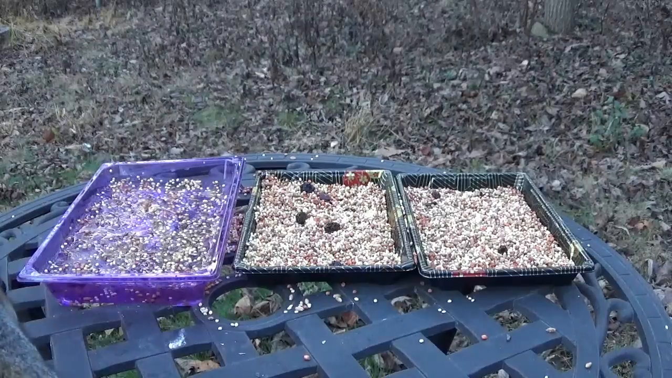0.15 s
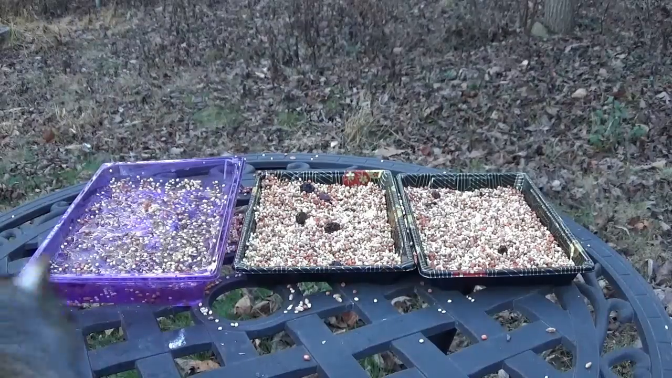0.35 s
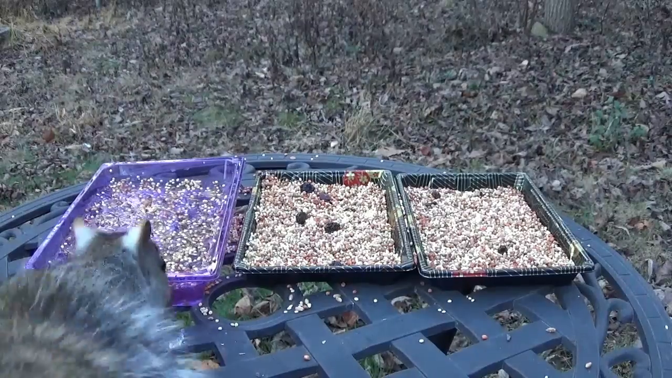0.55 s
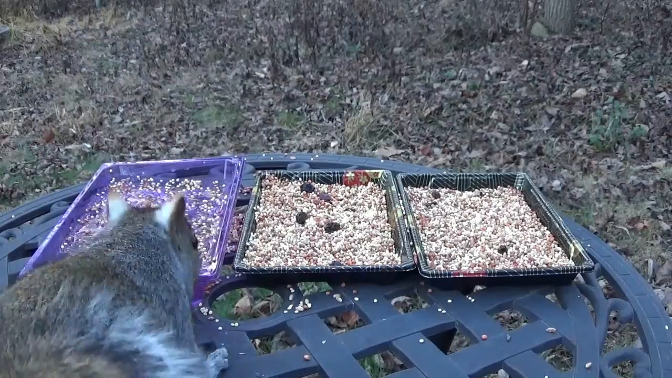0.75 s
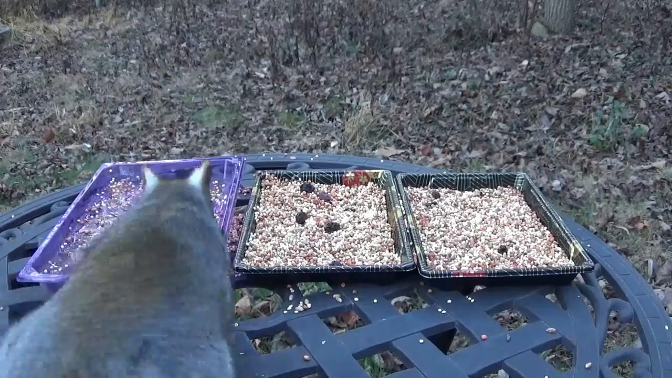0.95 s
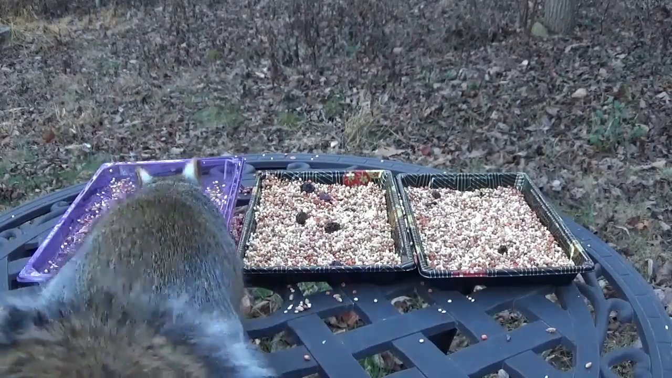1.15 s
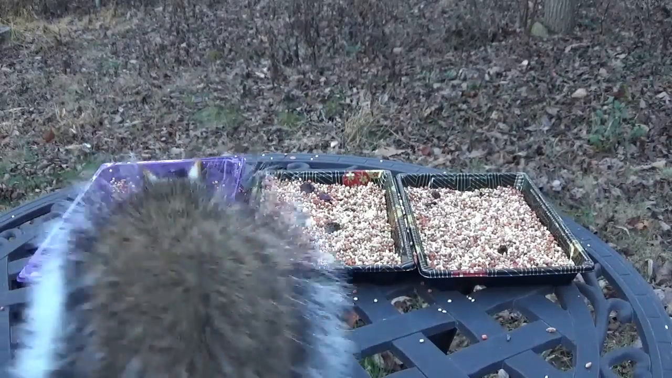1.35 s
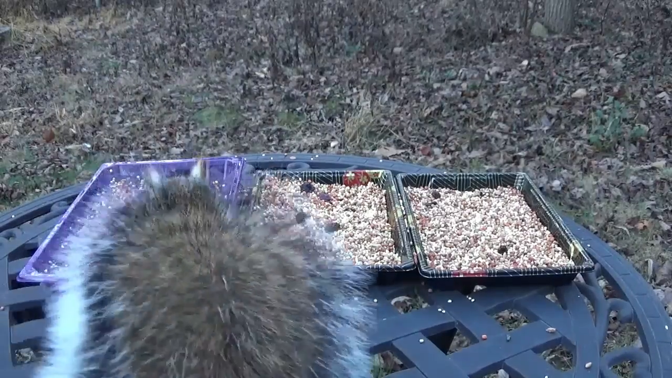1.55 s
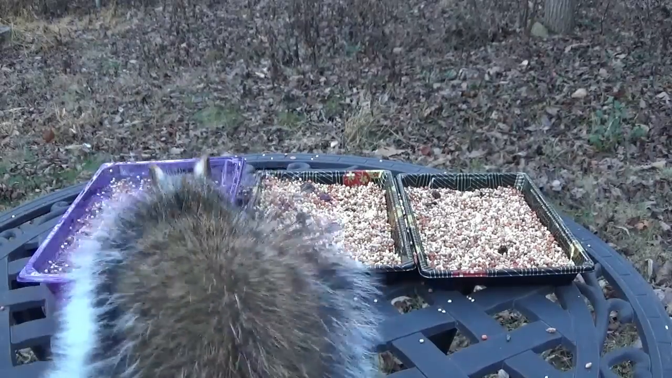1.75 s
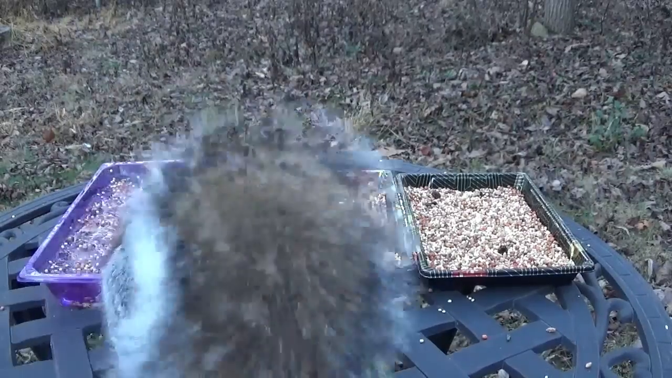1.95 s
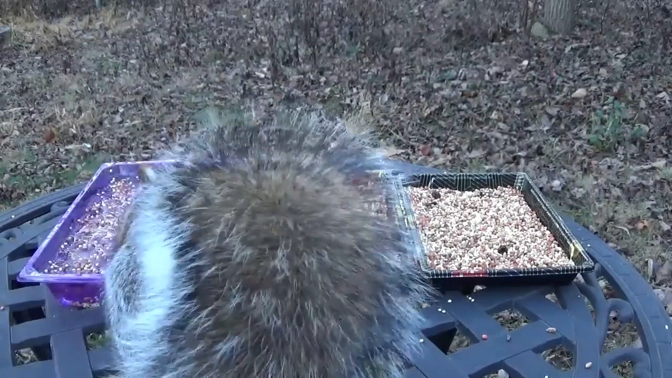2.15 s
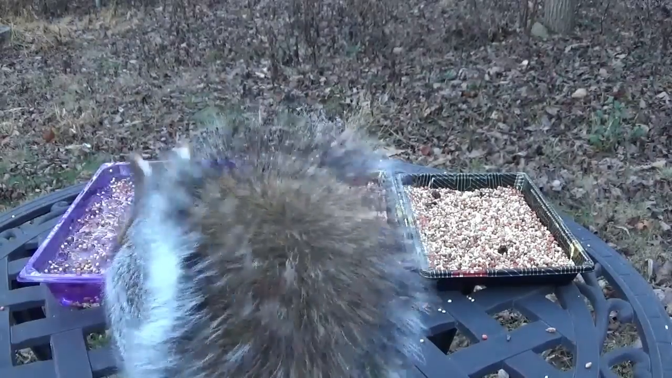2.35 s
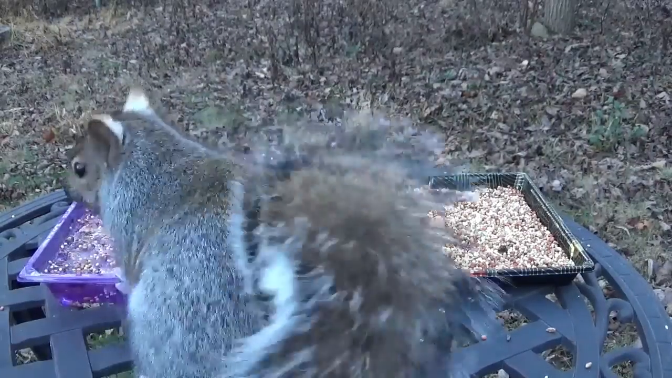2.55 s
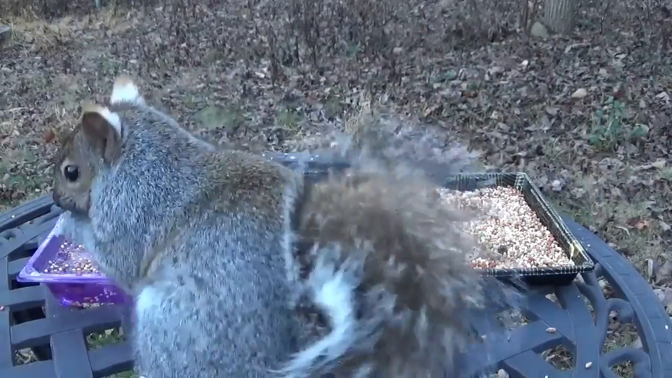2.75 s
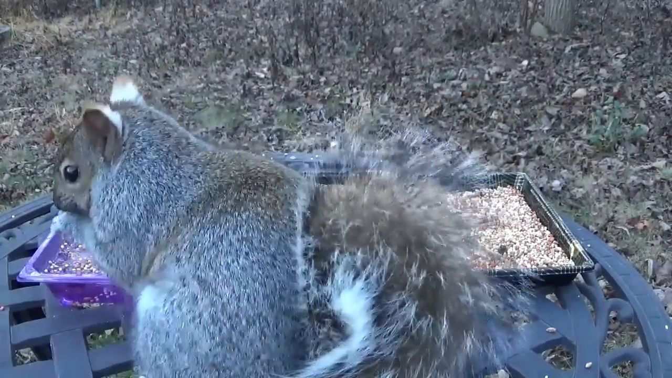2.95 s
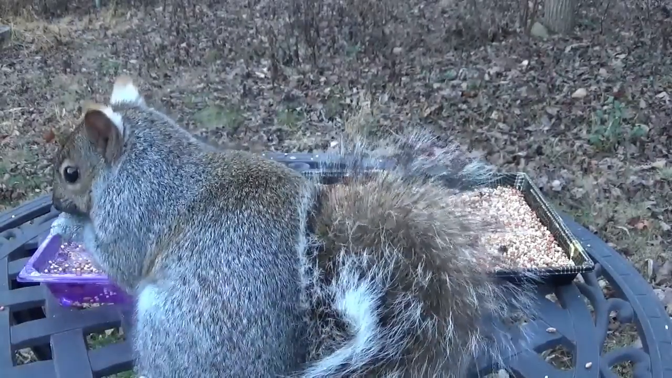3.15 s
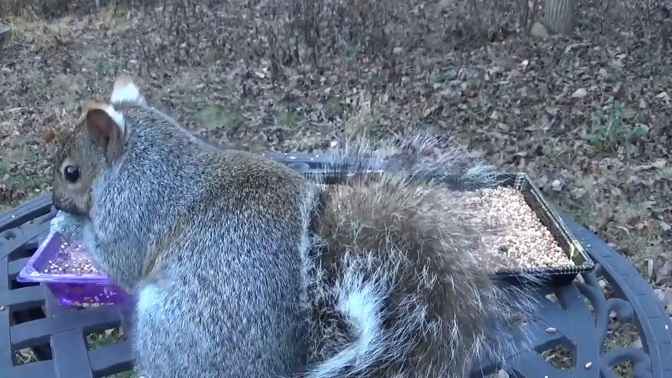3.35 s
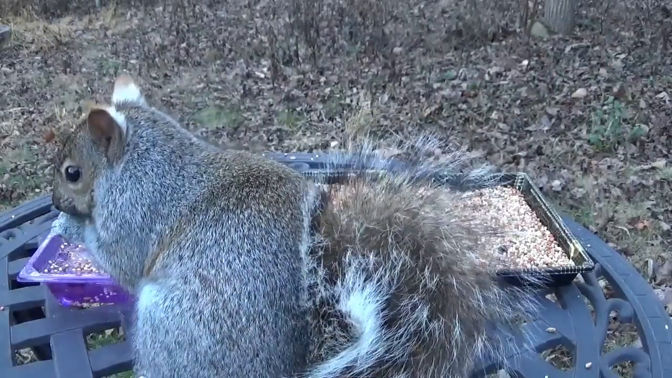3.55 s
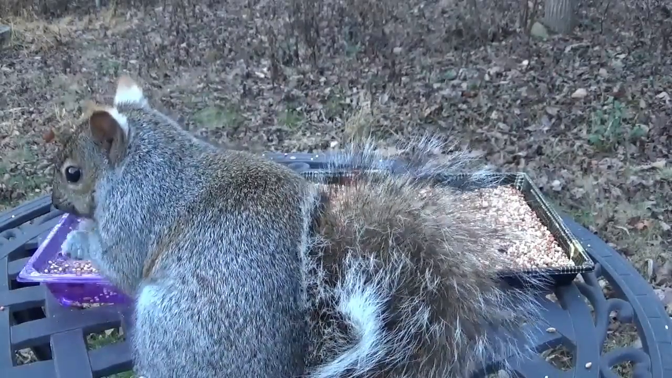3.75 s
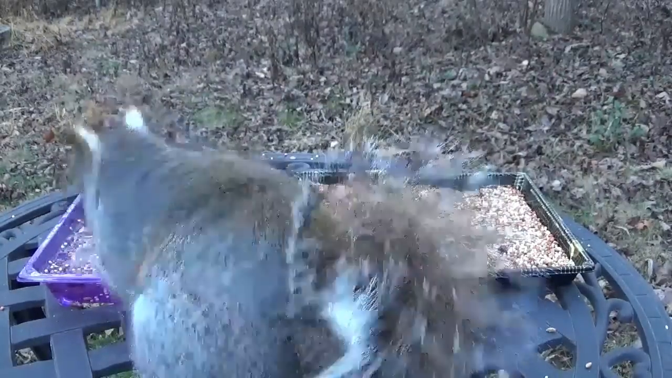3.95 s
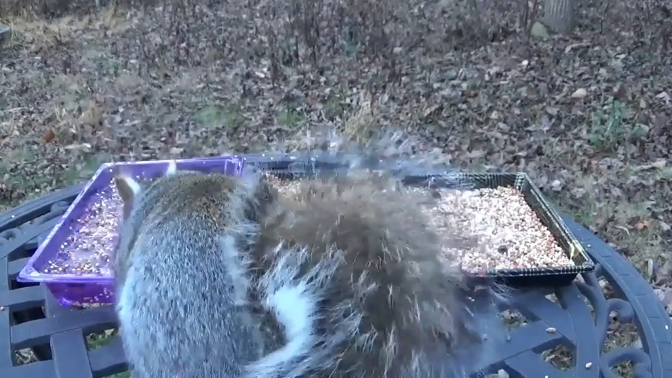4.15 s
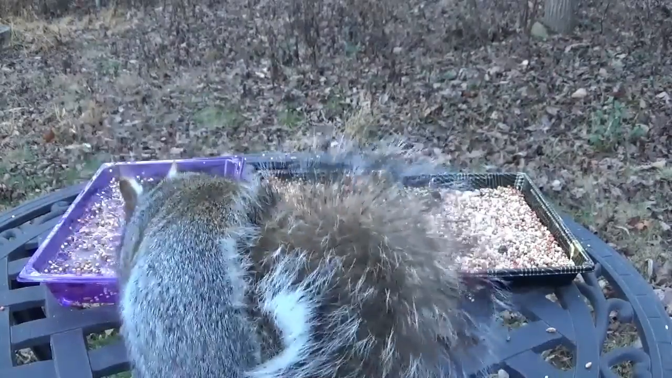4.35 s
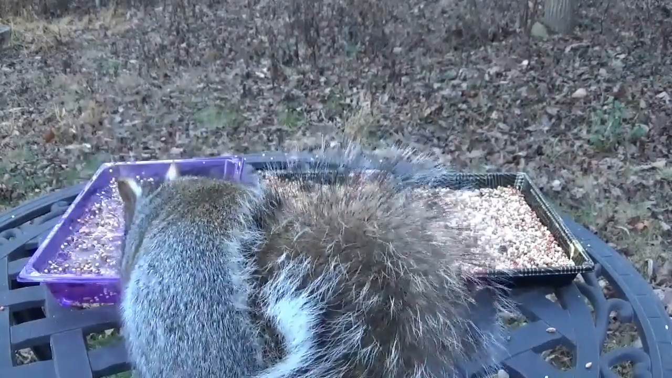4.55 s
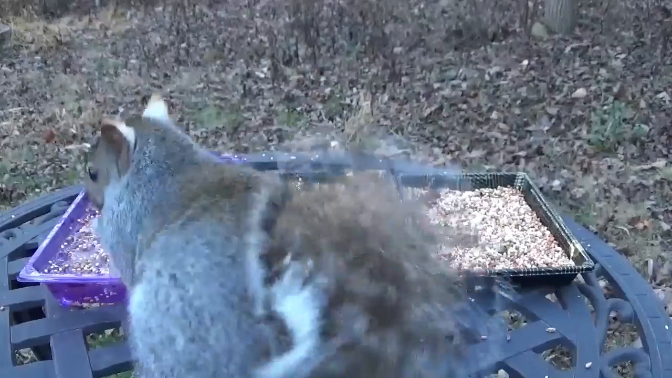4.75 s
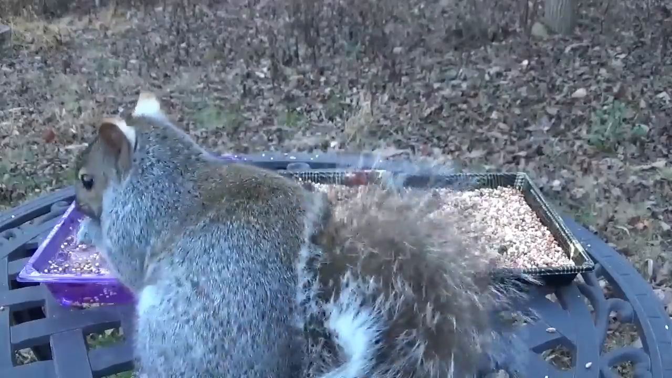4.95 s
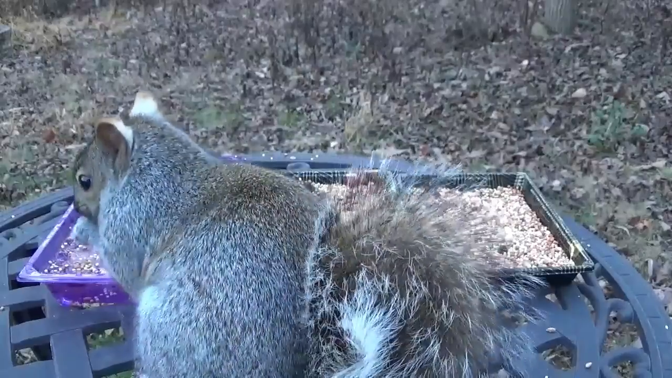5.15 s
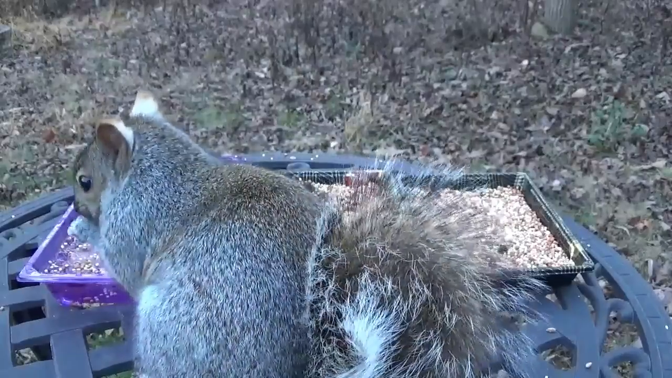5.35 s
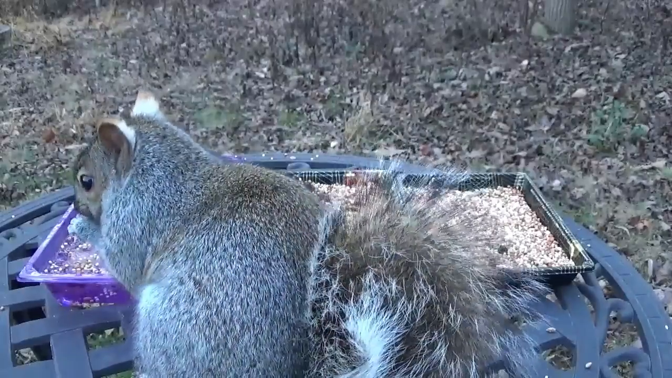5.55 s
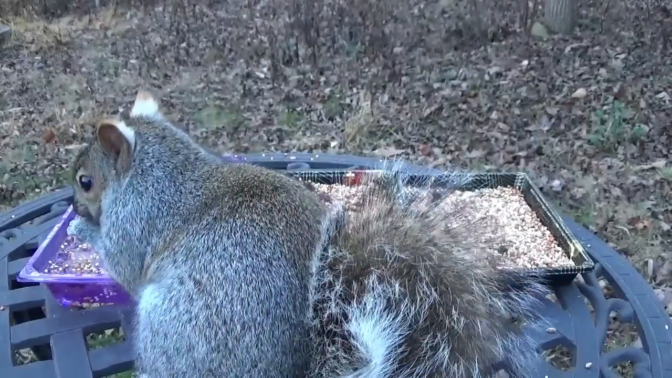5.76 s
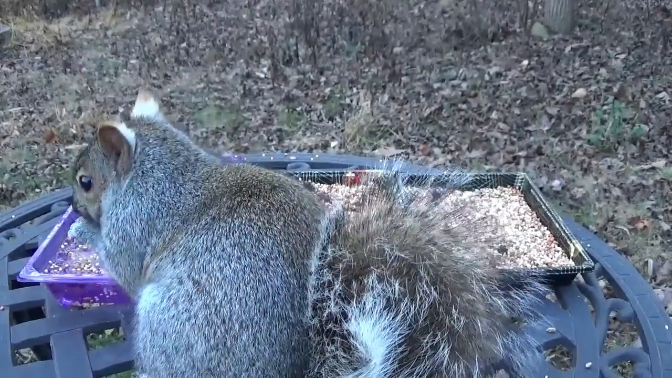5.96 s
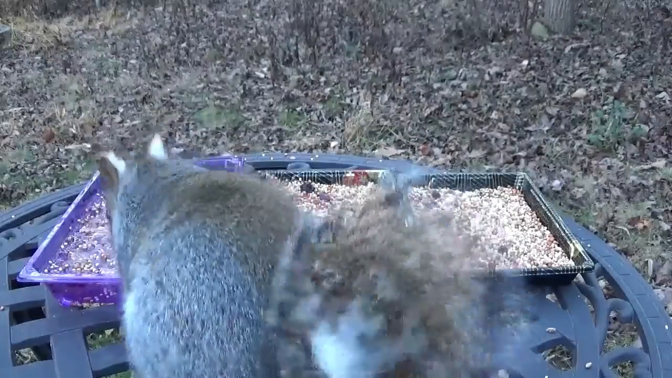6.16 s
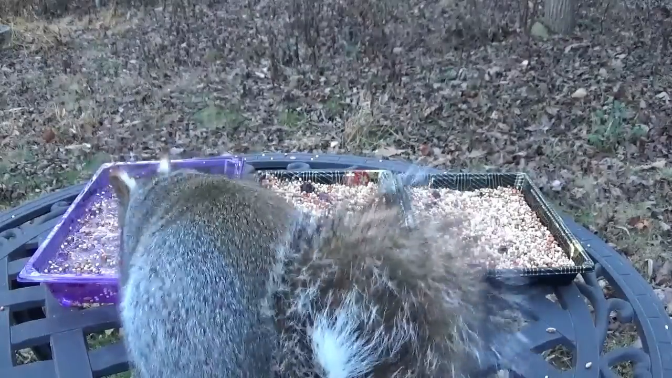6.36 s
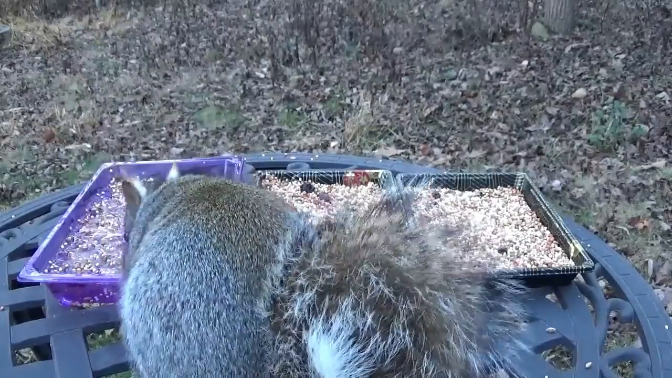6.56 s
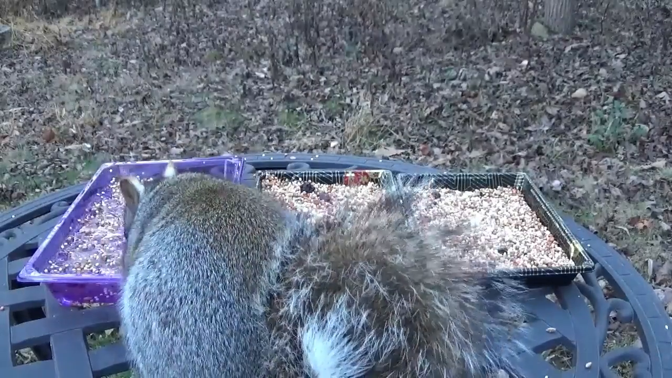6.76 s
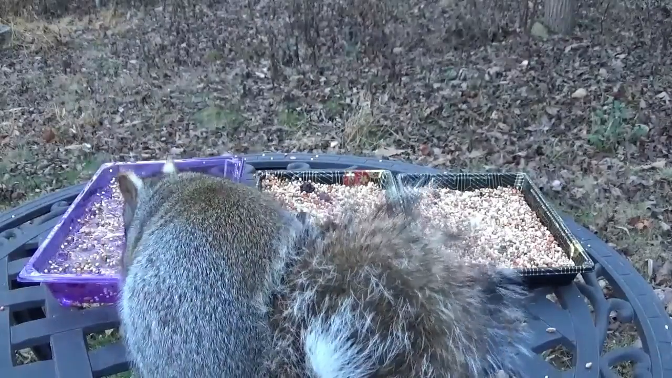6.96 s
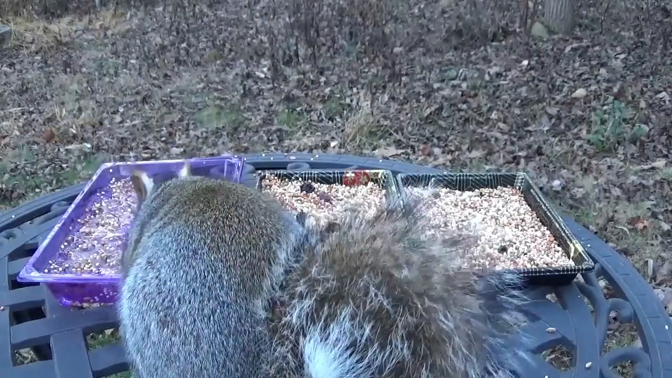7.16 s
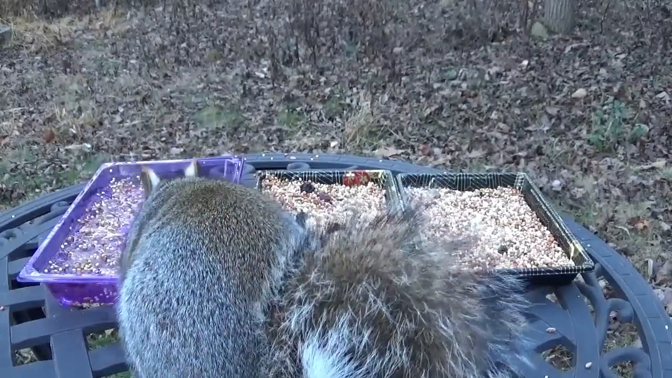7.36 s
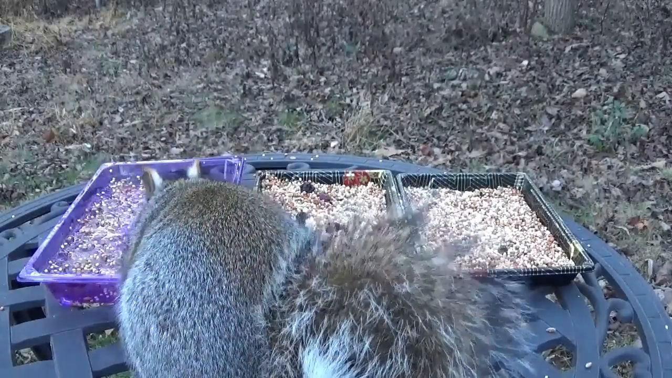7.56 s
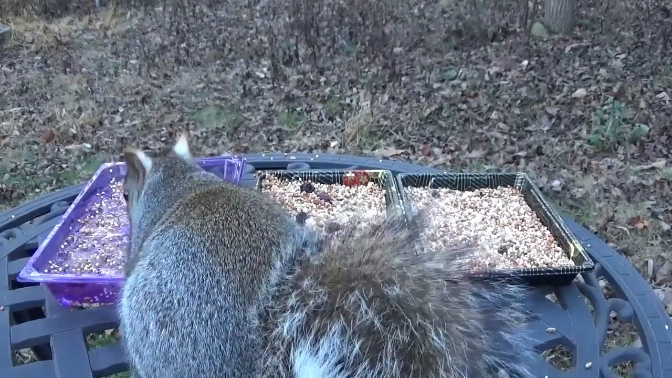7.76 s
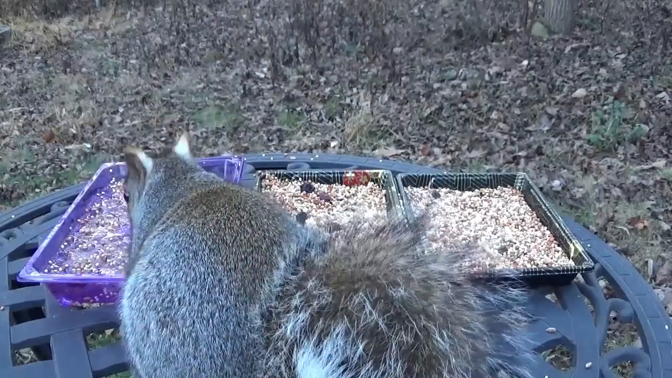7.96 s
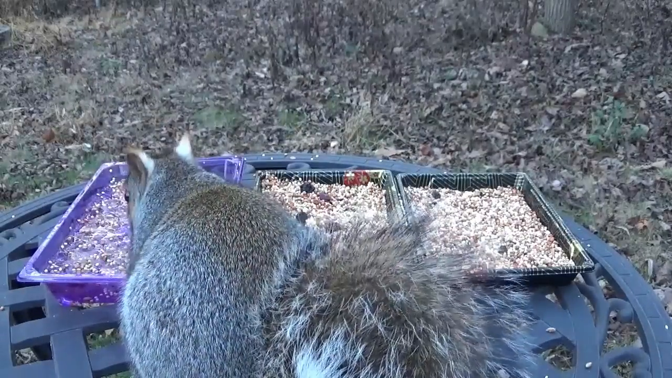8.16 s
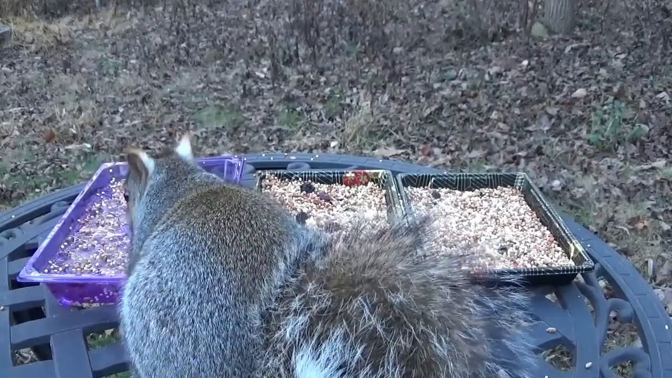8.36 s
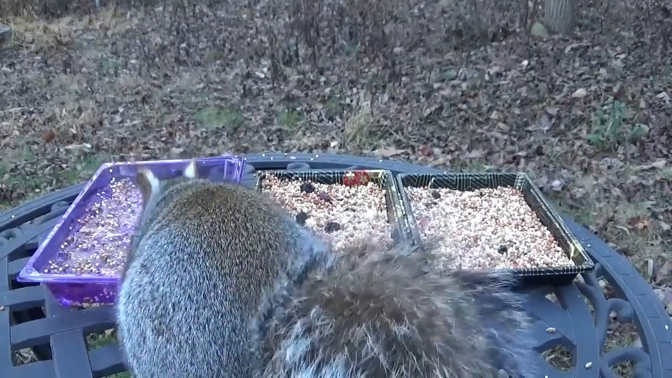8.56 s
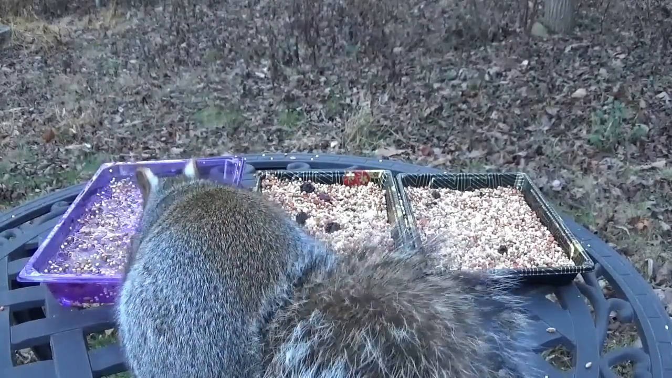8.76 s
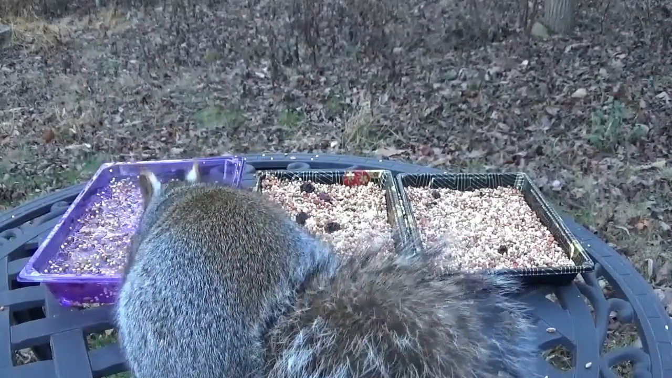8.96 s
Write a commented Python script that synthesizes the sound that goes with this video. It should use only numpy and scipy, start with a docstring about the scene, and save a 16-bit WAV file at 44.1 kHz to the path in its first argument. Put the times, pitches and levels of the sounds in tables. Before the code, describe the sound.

Close, dry claw taps and seed scuffing on a cast metal table, followed by crisp nibbling and shell cracks over faint distant traffic.

```python
"""Garden with a cast metal table: a squirrel climbs, scuffs among seed trays and cracks seeds, heard close by.
Claw noise excites decaying lattice modes; paws make gritty friction noise; shells break as short impulses.
A faint quick rattle of resonant ticks comes and goes, fur and seeds rustle as bright grains, and a bird
chips in short sine notes. Distant traffic and hiss lie behind, as noise with a shaped spectrum."""
import sys
import numpy as np
from scipy import signal
from scipy.fft import rfft, irfft
from scipy.io import wavfile
from scipy.ndimage import uniform_filter1d

SR = 44100
rng = np.random.default_rng(int(sys.argv[2]) if len(sys.argv) > 2 else 0)


def to_wav(sig):
    """Store sig (one row per channel, or 1-D mono) as 16-bit WAV at the path in sys.argv[1].

    Samples outside -1..1 are clipped; the rate is SR.
    """
    pcm = np.clip(np.atleast_2d(sig), -1, 1) * 32767
    pcm = np.round(pcm).astype(np.int16)
    wavfile.write(sys.argv[1], SR, pcm.T)  # frames by channels


N = 396900
LEAD = 128  # samples of silence before a burst


def gain_of(db):
    """Decibel definition: amplitude ratio of a level."""
    return 10 ** (np.asarray(db) / 20)


def evened(x):
    """Normalisation: scales a signal to an rms of 1."""
    return x / np.sqrt(np.mean(x ** 2) + 1e-20)


def read(points, hz):
    """Logarithmic pitch scale: interpolates a (frequency, value) table along it."""
    f, value = np.transpose(points)
    return np.interp(np.log(hz + 1), np.log(f + 1), value)


def curve(rows):
    """Linear interpolation: each column after the time becomes a curve over the whole scene."""
    s, *columns = np.transpose(rows)
    return np.array([np.interp(np.arange(N) / SR, s, c) for c in columns])


def add(mix, s, sound, pan_db):
    """Superposition: adds a sound at s seconds, pan_db louder on the left than on the right."""
    part = mix[:, round(s * SR):][:, :len(sound)]
    part += gain_of([[pan_db / 2], [-pan_db / 2]]) * sound[:part.shape[1]]


def ring(x, hz, width):
    """Damped resonance: a two-pole filter of gain 1 at its centre, width in Hz."""
    r = np.exp(-np.pi * width / SR)
    return signal.lfilter([1 - r * r, 0, r * r - 1], [2, -4 * r * np.cos(2 * np.pi * hz / SR), 2 * r * r], x)


# Centres of the bass, body, presence and treble bands: pitch_hz
BAND_CENTRES = [420, 2400, 4500, 7400]


def coloured(burst, bands_db, lumps_db):
    """Band analysis: sets the rms level of four overlapping bands, measured over the opening of the burst."""
    hz = np.fft.rfftfreq(len(burst), 1 / SR)
    # Chance resonances of shell, seed and tray
    lumps = np.interp(hz, np.linspace(0, SR / 2, 50), rng.standard_normal(50))
    bass_cut = hz ** 2 / (hz ** 2 + 160 ** 2)
    spectrum = rfft(np.roll(burst, LEAD)) * gain_of(lumps_db * lumps) * bass_cut
    head = LEAD + SR // 100  # the silent lead and the first hundredth of a second
    total = 0
    for db, one in zip(bands_db, np.eye(len(BAND_CENTRES))):
        weight = read(list(zip(BAND_CENTRES, one)), hz) ** 1.9
        band = irfft(spectrum * weight, len(burst))
        total = total + gain_of(db) * band / np.sqrt(np.mean(band[:head] ** 2))
    return total


def bands_of(treble_db, body_db, colour):
    """Spectral balance: colour = (bass relative to body dB, presence lift dB, share of treble in presence)."""
    bass_db, lift_db, share = colour
    presence_db = lift_db + share * treble_db + (1 - share) * body_db
    return np.array([body_db + bass_db, body_db, presence_db, treble_db])


def rub(bands_db, rise, t60, grain_db=0.5, bend=0.71):
    """Dry friction: gritty noise swells over rise seconds and decays by 60 dB in t60 (at most 0.2 s)."""
    t = np.arange(16384) / SR
    unevenness = evened(uniform_filter1d(rng.standard_normal(len(t)), 30))
    grit = rng.standard_normal(len(t)) * gain_of(grain_db * unevenness)
    swell = 1 - np.exp(-t / max(rise, .0003))
    decay = gain_of(-60 * (t / np.clip(t60, .01, .2)) ** bend)  # steep at first, then slower
    return coloured(grit * swell * decay, np.array(bands_db), 2.57)


# Spectrum of distant traffic and hiss: pitch_hz, relative level per hertz [dB]
YARD_SPECTRUM = [(15, -33.5), (28, -19), (45, -11), (65, -3), (105, 4), (130, -4.5), (170, -10), (300, -12),
                 (420, -13.5), (750, -11), (1000, -15), (1400, -18), (2400, -19.5), (3200, -20),
                 (5000, -24.5), (11000, -29), (14000, -70)]
# Likeness of left and right: pitch_hz, correlation [0 to 1]
YARD_LIKENESS = [(60, 1.0), (140, 0.99), (350, 0.68), (840, 0.088), (2010, 0.11), (4840, 0.33),
                 (11700, 0.61)]
YARD_DB = -57.5


def yard():
    """Partly coherent noise: random short-time spectra drift in patches; left and right share the bass."""
    frames, hz = N // 256 + 5, np.fft.rfftfreq(1024, 1 / SR)
    a, b, c, d, patches = rng.standard_normal((frames, 513, 5)).T
    patches = uniform_filter1d(patches, 10, 0)  # across pitch
    patches = evened(uniform_filter1d(patches, 16, 1))  # across time
    same = np.clip(read(YARD_LIKENESS, hz), -1, 1)[:, None]
    left = a + 1j * b
    right = same * left + np.sqrt(1 - same ** 2) * (c + 1j * d)
    spectra = np.array([left, right]) * gain_of(read(YARD_SPECTRUM, hz)[:, None] + 0.32 * patches)
    noise = signal.istft(spectra, nperseg=1024, noverlap=768)[1][:, :N]
    return gain_of(YARD_DB) * evened(noise)


# Bird notes: start_s, relative level_db, pitch_hz
BIRD_NOTES = [(5.067, -66, 3230), (8.742, -66, 3200), (8.929, -66, 6850), (8.941, -45.5, 6230)]


def bird():
    """Discrete echoes: each short pure note returns faintly from across the yard."""
    out, t = np.zeros((2, N)), np.arange(700) / SR
    for s, db, hz in BIRD_NOTES:
        envelope = (t / 0.003) ** 3 * np.exp(3 - 3 * t / 0.0039)
        note = envelope * np.sin(2 * np.pi * hz * t)
        # (delay s, gain dB): the direct note comes first
        for late, path_db in [(0, 6), (.012, -18), (.018, -17), (.025, -15), (.037, -17), (.046, -26)]:
            add(out, s + late, gain_of(db + path_db) * note, -3)
    return out


# Fur and seeds shifting: start_s, level_db (before the overall cut of 4.5 dB)
RUSTLE_LEVELS = [(0.0, -69), (0.2, -61), (0.48, -50.5), (0.8, -60), (1.3, -61), (1.45, -51), (1.6, -57),
                 (2.28, -65), (3.46, -59), (4.51, -63.5), (5.61, -59), (6.14, -60.5), (6.39, -64),
                 (7.67, -62), (8.0, -62.5), (9.0, -64)]


def rustle():
    """Granular noise: fur and seeds shed tiny bright impulses, clumped, a few of them larger."""
    present = rng.random((2, N)) < 2500 / SR  # about 2500 grains a second on each side
    size = gain_of(4.03 * np.minimum(rng.exponential(1, (2, N)), 4)) * present
    highpass = signal.butter(2, 4200, "highpass", fs=SR, output="sos")
    grains = signal.sosfilt(highpass, size * rng.standard_normal((2, N)))
    clumps = gain_of(3.6 * evened(uniform_filter1d(rng.standard_normal(N), 900)))
    shared = grains + 0.48 * grains[::-1]  # each side hears some of the other
    return gain_of(curve(RUSTLE_LEVELS) - 4.5) * evened(shared * clumps)


# Spells of rattling: start_s, end_s
RATTLE_SPELLS = [(1.4, 7.79), (8.62, 11)]
# Lower modes of the rattle: pitch_hz, width_hz (of each of two filter passes), relative level_db
RATTLE_LOWER_MODES = [(2555, 220, 0), (2736, 307, 3.5), (3100, 170, 6), (3480, 460, 5)]
RATTLE_TOP_HZ, RATTLE_TOP_WIDTH_HZ = 4005, 80
RATTLE_TOP_DB, RATTLE_LOWER_DB, RATTLE_FADE_S = -74, -70, 0.019


def rattle():
    """Impulse-driven resonance: soft ticks, some skipped, excite a clear top mode and rougher lower ones."""
    count, per_s, skipped, spread_db = 500, 46, .12, 1.4
    jitter = .1  # share of the tick period
    draw = rng.standard_normal((count, 2 + len(RATTLE_LOWER_MODES)))
    at = (np.cumsum(1 + jitter * draw[:, 0]) * SR / per_s).astype(int)
    keep = (at < N) & (rng.random(count) > skipped)
    ticks = np.zeros((1 + len(RATTLE_LOWER_MODES), N))
    ticks[:, at[keep]] = gain_of(spread_db * (draw[keep, 1:] + draw[keep, 1:2])).T
    pip = np.hanning(400) * np.sin(2 * np.pi * RATTLE_TOP_HZ * np.arange(400) / SR)
    top = ring(signal.oaconvolve(ticks[0], pip)[:N], RATTLE_TOP_HZ, RATTLE_TOP_WIDTH_HZ)
    puffs = signal.oaconvolve(ticks[1:], np.hanning(240)[None], axes=1)[:, :N] * rng.standard_normal(N)
    lower = 0
    for puff, (hz, width, db) in zip(puffs, RATTLE_LOWER_MODES):
        lower = lower + gain_of(db) * evened(ring(ring(puff, hz, width), hz, width))
    t, on = np.arange(N) / SR, 0
    for start, end in RATTLE_SPELLS:
        on = on + np.clip(np.minimum(t - start, end - t) / RATTLE_FADE_S + .5, 0, 1)
    both = gain_of(RATTLE_TOP_DB) * evened(top) + gain_of(RATTLE_LOWER_DB) * evened(lower)
    return on * both * gain_of([[1.], [-1.]])


# Weight dropping on a paw: start_s, level_db (band levels below are added to it)
PAW_THUDS = [(0.4428, -53), (0.4776, -55), (0.9495, -44), (1.069, -45), (2.8102, -50), (6.76, -55)]
# Balance of a thud: relative level_db of the bass, body, presence and treble bands
THUD_BALANCE = [-6.2, -16, -16, -6]
THUD_T60_S, STRIKE_RISE_S = 0.045, 0.0033  # claw strikes rise as fast as thuds
SCUFF_PAN_DB = 2


def thuds():
    """Impact noise: weight dropping on a paw gives a dull, quickly damped burst."""
    out = np.zeros((2, N))
    for s, db in PAW_THUDS:
        thud = rub(db + np.array(THUD_BALANCE), STRIKE_RISE_S, THUD_T60_S)
        add(out, s - LEAD / SR, thud, SCUFF_PAN_DB)
    return out


# Paws in the seeds: start_s, treble_db, body_db, t60_s
PAW_SCUFFS = [(0.2565, -54, -53, 0.068), (0.2704, -46, -52, 0.065), (0.497, -52, -62, 0.09),
              (0.5135, -40, -58, 0.083), (0.5213, -28, -58.5, 0.13), (0.6413, -47, -66, 0.046),
              (0.7814, -48, -67, 0.072), (0.9314, -46, -65, 0.098), (1.0213, -60, -64, 0.27),
              (1.253, -41, -64, 0.09), (1.2708, -53, -61, 0.13), (1.3319, -43.5, -57, 0.15),
              (1.3516, -48.5, -59, 0.17), (1.434, -45.5, -60.5, 0.096), (1.478, -54.5, -58.5, 0.09),
              (1.8286, -51, -71, 0.27), (1.8975, -41, -55, 0.051), (1.9243, -47, -64, 0.1),
              (1.955, -55, -60, 0.16), (2.4244, -56, -67, 0.18), (2.4562, -54, -68, 0.25),
              (2.5568, -42, -60, 0.062), (2.7297, -51, -69, 0.11), (2.7586, -52.5, -79, 0.09),
              (4.0612, -50.5, -65, 0.12), (4.1257, -50, -54, 0.11), (4.149, -61, -57, 0.11),
              (4.1635, -63, -51.5, 0.048), (4.7575, -44.5, -62, 0.14), (6.0991, -55.5, -71, 0.25),
              (6.1308, -61, -71, 0.27), (7.456, -56, -61, 0.27), (7.507, -48.5, -50.5, 0.084),
              (7.526, -48.5, -48, 0.057), (7.54, -51, -51.5, 0.18), (7.556, -43.5, -52, 0.059),
              (7.5806, -62, -64, 0.21), (7.7284, -46, -54, 0.11), (7.7462, -52, -53.5, 0.071),
              (7.7757, -54, -58, 0.051), (7.8267, -54, -65, 0.11)]
SCUFF_RISE_SHARE = 0.033  # of t60: longer scuffs swell more slowly
SCUFF_COLOUR = (-13, -5.2, 0.49)


def scuffs():
    """Sliding friction: paws scuff dryly through the seeds."""
    out = np.zeros((2, N))
    for s, treble_db, body_db, t60 in PAW_SCUFFS:
        scuff = rub(bands_of(treble_db, body_db, SCUFF_COLOUR), SCUFF_RISE_SHARE * t60, t60)
        add(out, s - LEAD / SR, scuff, SCUFF_PAN_DB)
    return out


# Modes of the cast lattice: pitch_hz, relative level_db, t60_s
LATTICE_MODES = [(640, 3, .08), (1050, 1, .07), (1475, 14, .25), (1943, 16, .28), (2180, 6, .1),
                 (2428, 2, .12), (2918, 2, .05), (3537, -2, .05), (4037, -6, .04), (4764, 3, .05),
                 (5234, 1, .04), (5990, 9, .06), (6345, 8, .05), (7156, 1, .03), (7650, 6, .035),
                 (8270, 1, .03), (9760, -2, .03), (10250, -2, .03)]
# Claws striking the lattice: start_s, treble_db, presence_db, body_db, t60_s (of the blow), ring_db (of the table)
CLAW_STRIKES = [(0.3975, -50.5, -56, -73, 0.062, 8), (0.531, -25, -37, -62, 0.057, 9),
                (0.5641, -46, -51, -48, 0.11, 8), (0.95, -41.5, -42.5, -46.5, 0.094, -6),
                (0.9722, -44, -45.5, -44, 0.075, 0), (1.294, -39, -53, -53, 0.079, 0.5),
                (1.4033, -52.5, -52, -62, 0.09, 6), (1.8765, -27, -43, -55, 0.11, -5),
                (1.8845, -26, -45, -81, 0.035, 10.5), (2.5343, -31, -43.5, -52.5, 0.075, -3)]
CLAW_PAN_DB, CLAW_BASS_DB = 0.8, -7.5  # bass is relative to the body


def claws():
    """Modal excitation: each claw strike sets the lattice modes ringing."""
    out = np.zeros((2, N))
    for s, treble_db, presence_db, body_db, t60, ring_db in CLAW_STRIKES:
        blow = rub([body_db + CLAW_BASS_DB, body_db, presence_db, treble_db], STRIKE_RISE_S, t60)
        spot_db = 2.5 * rng.standard_normal(len(LATTICE_MODES))  # each spot favours other modes
        rings = 0
        for (hz, mode_db, mode_t60), favour_db in zip(LATTICE_MODES, spot_db):
            # width = 2.2 / t60 for an exponential decay
            rings = rings + gain_of(mode_db + favour_db) * ring(blow, hz, 2.2 / mode_t60)
        add(out, s - LEAD / SR, blow + gain_of(ring_db) * rings, CLAW_PAN_DB)
    return out


# Spells of faint gnawing: start_s, end_s
GNAWING_SPELLS = [(2.0, 2.4), (3.049, 3.85), (4.8, 5.8), (6.0, 7.2), (8.1, 8.7)]
NIBBLES_PER_S, NIBBLE_DB, NIBBLE_SPREAD_DB = 4, -59, 3


def nibbles():
    """Poisson process: faint snaps at chance moments within the gnawing spells."""
    rows = []
    for start, end in GNAWING_SPELLS:
        draw = rng.random((20, 3))
        at = start - np.cumsum(np.log(1 - draw[:, 0])) / NIBBLES_PER_S
        # treble and body levels, the body 7 dB lower on average
        db = NIBBLE_DB + NIBBLE_SPREAD_DB * (2 * draw[:, 1:] - 1) + [0, -7]
        rows += [(s, *pair) for s, pair in zip(at, db) if s < end]
    return rows


# Shell snaps: start_s, treble_db, body_db
SHELL_SNAPS = [(1.6438, -52.5, -59), (1.9734, -48, -48), (2.059, -55.5, -59.5), (2.2798, -51, -60),
               (2.4371, -65, -53), (3.0825, -60, -73), (3.1825, -58.5, -71), (3.246, -55, -68),
               (3.3052, -50, -59), (3.3263, -31.5, -56), (3.383, -41, -56), (3.4417, -30, -54.5),
               (3.4982, -50, -59), (3.5053, -33, -55.5), (3.5553, -52, -76), (3.5785, -25.5, -49.5),
               (3.5834, -58, -71), (3.8321, -59, -68), (3.8988, -50, -56.5), (3.937, -50.5, -65),
               (4.092, -76, -58), (4.107, -65, -60), (4.4174, -44, -58), (5.2708, -56, -80),
               (5.2918, -36.5, -53), (5.3944, -51, -58.5), (5.399, -51, -56.5), (5.407, -51, -55),
               (5.449, -51, -54.5), (5.459, -36.5, -51), (5.513, -51, -53), (5.516, -53, -56),
               (5.5214, -38.5, -47), (5.597, -46.5, -58.5), (5.669, -37.5, -52.5), (5.7296, -52, -63.5),
               (5.7838, -56, -71), (5.8033, -37, -53), (5.9144, -21, -36), (5.9793, -35, -49.5),
               (6.077, -59, -78), (6.2002, -48, -56), (6.3023, -58, -56.5), (6.705, -56, -61),
               (7.7086, -56, -65), (7.9145, -43.5, -41), (8.1442, -56, -64), (8.4142, -43, -77),
               (8.5743, -68, -60), (8.98, -51, -59)]
SNAP_T60_S, SNAP_PAN_DB, SNAP_COLOUR = 0.0057, 3.5, (-14, -5.2, 0.53)
# A snap with this treble breaks cleanly; fainter ones crumble (slope: dB of step lost per dB)
SHARP_DB, SHARP_SLOPE = -7.5, 0.44


def snaps(echo_s=0.0054, echo_db=-24, creak_t60=0.0025):
    """Brittle fracture: a shell creaks, breaks in a sharp step, splinters and echoes once from the table top."""
    out, t = np.zeros((2, N)), np.arange(2048) / SR
    breaks = 44  # samples from first creak to break
    after = t - breaks / SR
    fall_db = np.where(after < 0, 60 * after / creak_t60, -60 * after / SNAP_T60_S)
    for s, treble_db, body_db in SHELL_SNAPS + nibbles():
        splinters_db = 3.7 * rng.standard_normal(len(t)) + fall_db
        burst = rng.standard_normal(len(t)) * gain_of(splinters_db)
        strength_db = max(treble_db, body_db + 7)
        burst[breaks] = gain_of(21.5 + SHARP_SLOPE * min(strength_db - SHARP_DB, 0))
        echo = np.roll(burst, round(echo_s * SR)) * rng.standard_normal(len(t))
        burst = burst + gain_of(echo_db) * echo
        snap = coloured(burst, bands_of(treble_db, body_db, SNAP_COLOUR), 1.5)
        add(out, s - LEAD / SR, snap, SNAP_PAN_DB)
    return out


def nearby(x):
    """Early reflections: sparse decaying returns from ground and trays, different left and right."""
    t = np.arange(2600) / SR
    present = (rng.random((2, len(t))) < .08) * (t > .001)
    taps = rng.standard_normal((2, len(t))) * present * gain_of(-60 * t / 0.031)
    return signal.oaconvolve(x, taps / np.linalg.norm(taps[0]), axes=1)[:, :N]


def scene():
    """Superposition: the background, then the near sources with their reflections."""
    background = yard() + bird() + rustle()
    near = rattle() + thuds() + scuffs() + claws() + snaps()
    return background + near + gain_of(-14) * nearby(near)


EDGE_HZ = 11050


def record(dry):
    """Band limiting: a steep low-pass filter."""
    lowpass = signal.firwin(301, EDGE_HZ, window=("kaiser", 7), fs=SR)
    return signal.oaconvolve(dry, lowpass[None], "same")


dry = scene()
out = record(dry)
to_wav(out)
```